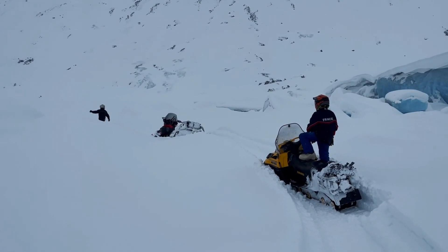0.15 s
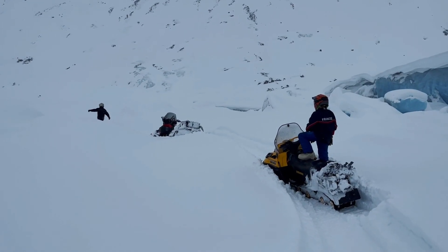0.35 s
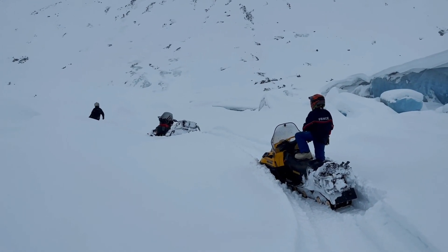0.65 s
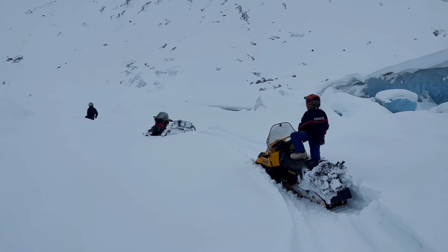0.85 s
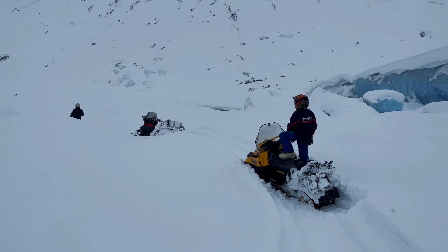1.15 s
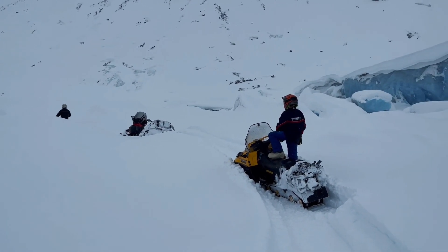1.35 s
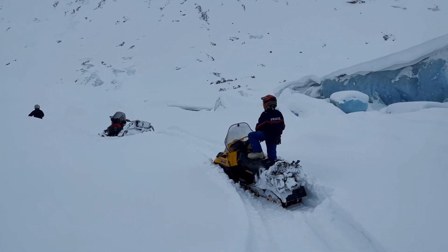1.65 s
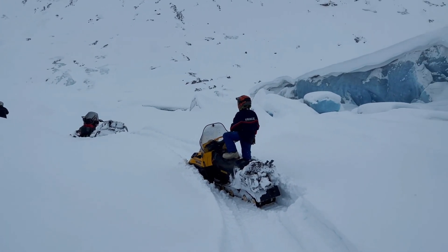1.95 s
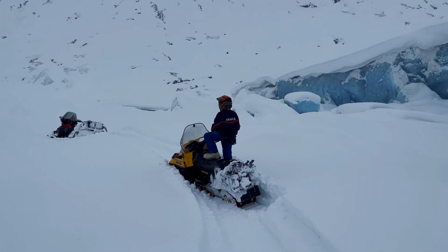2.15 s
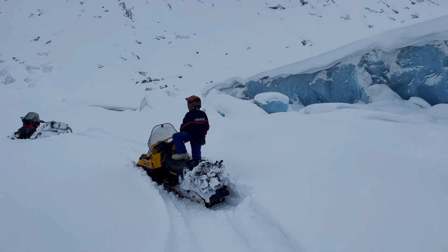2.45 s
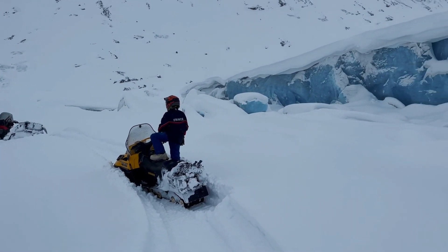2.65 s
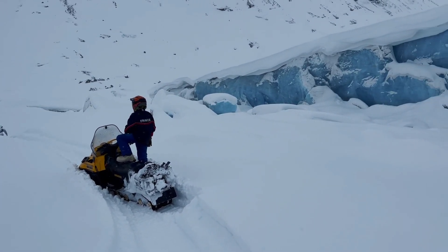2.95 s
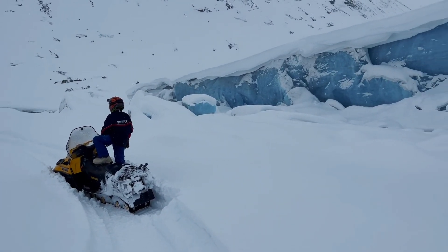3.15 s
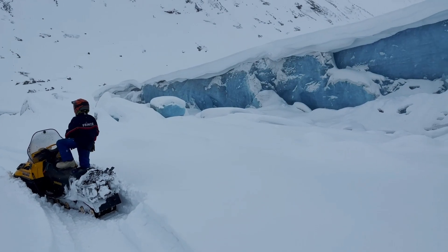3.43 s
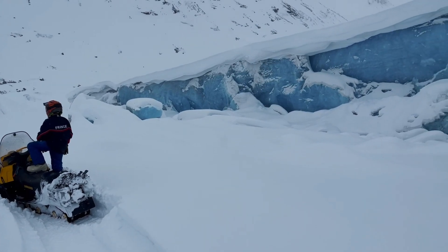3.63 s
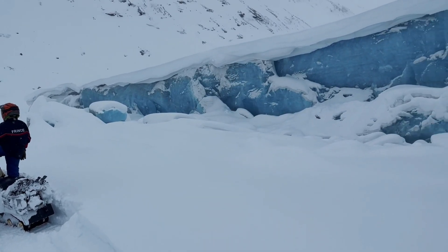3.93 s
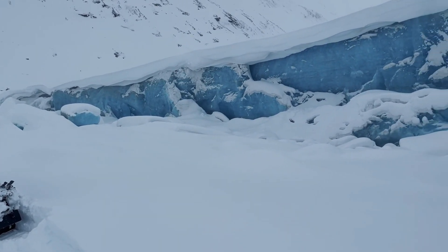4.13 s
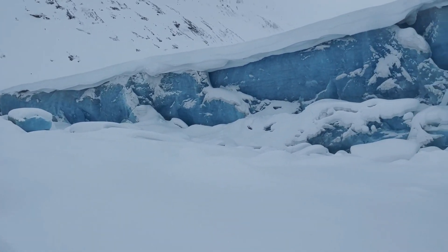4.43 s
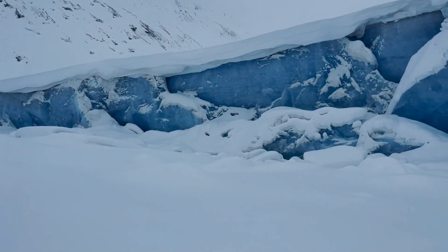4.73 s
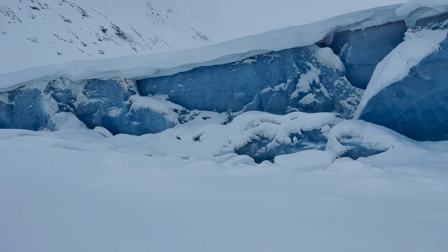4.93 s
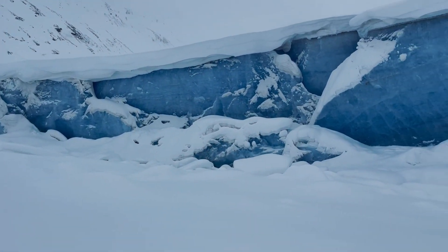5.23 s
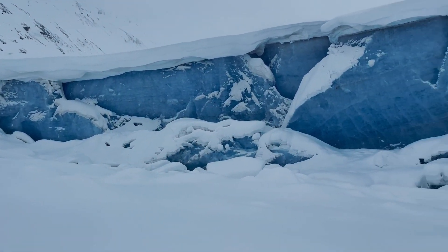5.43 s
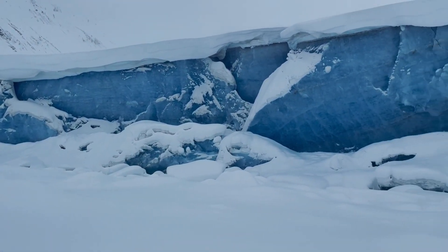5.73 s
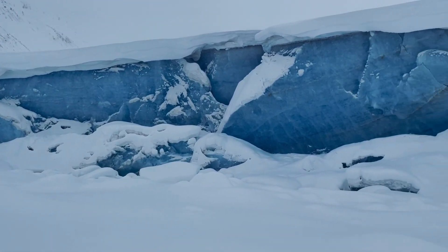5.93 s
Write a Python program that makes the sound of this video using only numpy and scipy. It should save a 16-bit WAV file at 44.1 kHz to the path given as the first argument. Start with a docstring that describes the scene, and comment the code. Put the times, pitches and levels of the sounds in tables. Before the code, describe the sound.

Uneven snowmobile idle, low thudding puffs and rattling clutch, surges briefly outdoors; heavy wind pops and tearing roars strike near the end.

```python
"""Open snow: a two-stroke snowmobile idles a few metres from a hand-held camera, with brief surges.
The exhaust thuds once a turn and misfires about every third: swinging puffs timed by the crank.
Pistons, clutch and cowling clatter with the crank: filtered noise bursts over a steady rush.
The camera pans away and the machine drifts left: delay, shading and gliding dips and peaks per port.
Wind buffets the microphone: low rumble, short roars and pointed pops; one dry click with a soft thump."""
import sys
import numpy as np
from scipy import signal
from scipy.fft import rfft, irfft
from scipy.io import wavfile
from scipy.ndimage import uniform_filter1d

SR = 44100
rng = np.random.default_rng(int(sys.argv[2]) if len(sys.argv) > 2 else 0)


def transcribe(u):
    """Save the signal u as a 16-bit wav file named by the first command-line argument.

    u: samples, shape (n,) or (channels, n), limited to [-1, 1]; the rate is SR.
    q: integer samples, one column per channel.
    """
    v = np.clip(np.atleast_2d(u).T, -1, 1)
    q = np.round(v * 32767).astype(np.int16)
    wavfile.write(sys.argv[1], SR, q)


N = 268348
TIME_S = np.arange(N) / SR

# crank speed, idle with quick surges: [t/s, speed/(turns/s)]
SPEED = [(0.0, 25.66), (1.0, 25.99), (1.16, 29.08), (1.57, 26.18), (1.7, 26.7), (1.94, 24.85), (2.52, 26.6),
         (2.62, 27.8), (2.76, 28.5), (2.95, 28.0), (3.06, 28.6), (3.16, 27.3), (3.42, 26.15), (4.11, 25.28),
         (4.18, 26.5), (4.56, 25.15), (4.86, 27.26), (5.68, 25.25), (6.08, 26.21)]
START_TURN = .941
# late, weak burns: [t/s]
MISFIRES = [.11, .27, .43, .58, .69, .81, .93, 1.04, 1.15, 1.25, 1.47, 1.59, 1.7, 1.73, 1.93, 2.05, 2.17,
            2.28, 2.4, 2.48, 2.51, 2.62, 2.72, 2.83, 3.01, 3.05, 3.27, 3.38, 3.49, 3.61, 3.73, 3.84, 3.96,
            4.04, 4.19, 4.3, 4.42, 4.46, 4.62, 4.66, 4.78, 4.88, 5.42, 5.46, 5.5, 5.58]
# ring of the silencer after each puff
PIPE_RING_S, PIPE_RING_SHARE = 0.018, 0.042

# knocks within each turn: [crank angle/turns, cowling level/dB, bright metal level/dB]
KNOCKS = [(-.03, -6.5, -20), (.05, -2.5, 0.5), (.62, -3.5, 6), (.73, -12, 0.5)]
METAL_SPREAD_DB = 2
# cowling and engine block, relative spectrum: [f/Hz, level per Hz/dB]
COWLING = [(100, -22.5), (250, 6.5), (410, -9), (500, -7.5), (620, 1), (900, 3), (1100, -2), (1600, 2.5),
           (2150, 0), (2700, -8.5), (3700, -23), (6000, -31.5), (12000, -42)]
# their panel modes: [f/Hz, width/Hz, boost/dB]
COWLING_MODES = [(403.3, 30, 17.3), (645, 9.7, 8.7), (798, 60, 9.3), (965, 19, 8.2), (1197, 137, 8.7),
                 (1346, 17, 5.1), (1465, 29, 4.9), (1500, 52, 2), (1613, 70, 5.2), (1674, 10, 9.2),
                 (1887, 38, 9), (1964, 35, 5.8), (2227, 96, 5.2), (2502, 18, 8.7), (3228, 410, 14.4),
                 (4300, 310, 14)]
# clutch and fins, relative spectrum: [f/Hz, level per Hz/dB]
METAL = [(300, -65), (1200, -5), (2000, 18), (2900, -13.5), (3700, 4.5), (4500, 7), (5300, 2), (6300, 7.5),
         (7400, 1), (8900, 7), (10000, -1), (11000, 4.5), (11700, -6), (12400, -39)]
# their resonances: [f/Hz, width/Hz, boost/dB]
METAL_MODES = [(3290, 110, -10.5), (4170, 120, 2)]
# clacks that stand out: [t/s, relative level/dB]
CLACKS = [(.2374, -42), (0.582, -38), (.814, -38), (1.047, -34.5), (1.1911, -34.5), (1.26, -39.5),
          (1.476, -36), (1.59, -36), (1.6995, -36.5), (1.935, -37), (2.093, -38), (2.404, -37),
          (2.555, -35), (3.887, -34.5), (4.124, -35.5), (4.355, -35), (4.5508, -33), (4.665, -35.5),
          (4.891, -36.5), (4.965, -38), (5.116, -37.5), (5.307, -37), (5.418, -37.5), (5.657, -37)]
# ordinary clacks, base strength: [t/s, relative level/dB]
CLACK_LEVEL = [(0, -44), (1.1, -45.5), (1.8, -37.5), (2.3, -41.5), (2.9, -49), (3.1, -39.5), (3.5, -38.5),
               (4.2, -41.5), (5.0, -37), (5.25, -43), (5.6, -41.5), (6.08, -48)]
# added to the ordinary clack on the turn after a misfire, from the jerk
JERK_DB = 2.8

# pan: [t/s, low-pitch lead of left port/ms, shadow before weighting/dB,
#       exhaust level/dB, cowling level/dB, bright metal level/dB]
PAN = [(0, -.01, 2, -42, -37, -50.5), (.6, 0.058, 2.5, -33.5, -39, -49.5),
       (1.2, 0.049, 1, -31.5, -38.5, -49.5), (1.8, 0.013, 0, -28, -39, -49),
       (2.4, 0.087, 4.5, -25, -39.5, -51), (3.0, 0.26, 1.5, -24, -39, -50.5),
       (3.7, 0.35, 6.5, -27, -39.5, -48.5), (4.4, 0.4, 6, -24.5, -39, -48.5),
       (5.0, 0.43, 3, -27.5, -40, -53), (5.5, 0.46, 2, -34, -38, -52), (6.08, 0.47, 2, -44, -39.5, -56.5)]
# weight of the shadow by pitch: [f/Hz, share]
SHADOW = [(100, 0.56), (600, 0.95), (1500, 1.13), (2700, 0.32), (3700, 2.3), (5500, 1.4), (7200, 0.095),
          (8500, 0.066)]
# extra phase lag of the right port's treble during the middle of the pan: [t/s, extra phase/turns]
TREBLE_LAG = [(2.75, 0), (2.95, .58), (3.4, .4), (3.7, .2), (4.4, 0)]
TREBLE_LAG_HZ = 3870
# gliding dips and peaks as the camera turns, left port: [width/octaves, [t/s, f/Hz, gain/dB]]
LEFT_GLIDES = [(.15, [(1.9, 2650, -21), (2.5, 2870, 11), (2.9, 2640, 11.5), (3.5, 2380, 5.5),
               (4.3, 2210, 5), (5.0, 2500, 1)]), (.2, [(2.0, 4200, 1.5), (2.5, 5400, -3), (2.9, 5940, -8),
               (3.3, 7000, -13), (4.05, 6700, -7.5), (6.08, 7800, -1)]), (.25, [(0, 5850, 3),
               (1.9, 6160, 2), (2.5, 7560, 6), (2.8, 7600, 2)]), (.4, [(3.0, 1760, -0.5), (4.2, 1650, -4),
               (5.0, 1510, -5.5), (6.08, 1550, -7)])]
# same, right port, which turns away from the machine: [width/octaves, [t/s, f/Hz, gain/dB]]
RIGHT_GLIDES = [(0.43, [(2.1, 2350, 1.5), (2.55, 2260, -9), (2.9, 2060, -12), (3.45, 1910, -6.5),
                (4.1, 1760, 1.5), (5.0, 1400, -0.5)]), (0.1, [(2.0, 6300, 1), (2.45, 5660, 8),
                (2.95, 3700, -9), (3.45, 3300, -35), (4.05, 2880, -36), (4.5, 2640, -17),
                (5.5, 2500, -25)]), (0.23, [(3.4, 7340, 1), (4.05, 6100, -8), (4.4, 5230, -7),
                (5.0, 4200, 1)]), (0.15, [(4.5, 7140, -3), (5.2, 6720, -19), (6.08, 6560, -12.5)]),
                (0.086, [(2.5, 6900, -4), (2.95, 6300, 5.5), (3.45, 4300, 14), (4.05, 3800, 15),
                (4.5, 3580, 15.5), (5.5, 3480, -27)]), (0.26, [(3.0, 2800, 0.5), (5.0, 650, -3)])]
# scattered sound, before its tilt by pitch
STRAY_DB = -13

# wind on the microphone, before flutter and gusts: [t/s, level/dB]
BREEZE = [(0, -25), (.65, -34.5), (1.3, -30), (1.6, -33), (2.8, -35.5), (3.4, -31), (4.0, -28), (4.9, -30),
          (5.5, -33), (6.08, -28.5)]
# wind rumble, relative spectrum: [f/Hz, level per Hz/dB]
RUMBLE = [(15, -44), (30, -16), (45, -6.5), (62, 0.5), (100, -2), (180, -7), (300, -22.5), (600, -33.5),
          (2000, -63)]
# level of the opposed part of the wind against the common part
WIND_APART = .42
# gusts striking the microphone: [t/s, length/s, level/dB, top of roar f/Hz]
BUFFETS = [(0.154, 0.026, -23, 517), (.194, 0.039, -28, 430), (0.839, 0.057, -30.5, 232),
           (2.319, 0.033, -28, 258), (3.738, 0.099, -27, 262), (4.17, 0.087, -29.5, 200),
           (4.533, 0.035, -26, 336), (4.988, 0.015, -15.5, 400), (4.996, 0.16, -19, 145),
           (5.009, 0.053, -18, 313), (5.068, 0.021, -25, 220), (5.116, 0.055, -16.5, 278),
           (5.24, 0.015, -19, 438), (5.272, 0.021, -17, 233), (5.33, 0.056, -19.5, 327),
           (5.517, 0.033, -24, 480), (5.614, 0.028, -19, 333), (5.677, 0.022, -21.5, 656),
           (5.733, 0.039, -21, 440), (5.775, 0.018, -13, 810), (5.792, 0.15, -16, 645),
           (5.943, 0.018, -19, 201), (6.001, 0.023, -22, 480), (6.053, 0.015, -25.5, 523)]
# small fast eddies right on the port: [t/s, peak level/dB, f/Hz]
POPS = [(.163, -14, 710), (4.548, -22.5, 395), (4.992, -0.5, 260), (5.018, -19, 510), (5.038, -9, 302),
        (5.055, -4, 268), (5.082, -12.5, 367), (5.1, -18.5, 436), (5.129, -9.5, 335), (5.14, -20, 171),
        (5.245, -7.5, 306), (5.349, -12.5, 337), (5.366, -19.5, 473), (5.379, -23.5, 510),
        (5.782, -20, 390), (5.789, -10.5, 1040), (5.822, -7, 1340), (5.829, -4, 1270), (5.838, -12, 1290),
        (5.849, -24, 1440), (5.858, -5.5, 1270), (5.864, -21, 1800), (5.882, -8, 1720), (5.89, -9.5, 1350),
        (5.931, -10, 1100)]
# dry click, soft thump: [t/s, thump level/dB]
CLICK = (3.082, -17)
# pops where the last gust tears: [t/s, length/s, middle peak level/dB, middle f/Hz]
CRACKLE = (5.818, 0.08, -19.5, 1150)
CRACKLE_OCTAVES = .6
EDGE_HZ = 12700


def gain_of(db):
    """Decibels to an amplitude factor."""
    return 10 ** (np.asarray(db) / 20)


def evened(x):
    """Scale to rms 1."""
    return x / np.sqrt(np.mean(x ** 2) + 1e-20)


def read(points, hz):
    """Interpolate a spectrum table on a log-frequency axis."""
    f, value = np.transpose(points)
    return np.interp(np.log(hz + 1), np.log(f + 1), value)


def curves(rows, t):
    """Interpolate every column of a time table at t."""
    s, *columns = np.transpose(rows)
    return [np.interp(t, s, c) for c in columns]


def add(mix, start_s, sound):
    """Mix a sound in at start_s, in place."""
    part = mix[..., max(round(start_s * SR), 0):][..., :sound.shape[-1]]
    part += sound[..., :part.shape[-1]]


def colour(x, spectrum, modes=()):
    """Causal minimum-phase filter: spectrum plus resonances."""
    size = 4096
    hz = abs(np.fft.fftfreq(size, 1 / SR))
    db = read(spectrum, hz)
    for f, width_hz, boost_db in modes:
        db = db + boost_db / (1 + (2 * (hz - f) / width_hz) ** 2)
    log_response = np.conj(signal.hilbert(np.log(gain_of(db))))
    response = np.fft.ifft(np.exp(log_response)).real
    return signal.oaconvolve(x, response)[:len(x)]


def crank(angle_turns):
    """Times/s at which the crank passes an angle: speed integrated, then inverted."""
    turns = START_TURN + np.cumsum(curves(SPEED, TIME_S)[0]) / SR
    return np.interp(np.arange(1, int(turns[-1]) + 1) + angle_turns, turns, TIME_S)


def misfired():
    """1 for every turn that misfires, else 0."""
    times = crank(.5)
    missed = np.zeros(len(times))
    missed[np.searchsorted(times, MISFIRES) - 1] = 1
    return missed


def exhaust(port_turns=0.5665, pipe_hz=124, hot_hz=66, cool_s=0.0054, swell_s=0.0082,
            misfire_db=-9.5, late_s=0.006, boom=0.29, boom_hz=88,
            spread_db=1.5, scatter_hz=4.1, jitter_s=0.00065, low_cut_hz=30):
    """The port opens half a turn after ignition; a puff swings the silencer, late, weak, cool on a misfire."""
    times, out, t = crank(port_turns), np.zeros(N), np.arange(SR // 8) / SR
    u = t / swell_s
    swell = u * np.exp(1 - u)
    swing = swell ** 0.91 + PIPE_RING_SHARE * (1 - np.exp(-u * 2)) * np.exp(-t / PIPE_RING_S)
    box = boom * swell ** 2 * np.cos(2 * np.pi * boom_hz * (t - swell_s))
    draws = rng.standard_normal((len(times), 3))
    for s, miss, (burn, tune, slip) in zip(times, misfired(), draws):
        # hot gas starts sharp, falls in pitch as it cools
        hz = pipe_hz + scatter_hz * tune + hot_hz * (1 - .5 * miss) * np.exp(-t / cool_s)
        pipe = swing * np.sin(2 * np.pi * np.cumsum(hz) / SR)
        gain = gain_of(misfire_db * miss + spread_db * burn)
        add(out, s + late_s * miss + jitter_s * slip, gain * (pipe + box))
    return evened(signal.sosfilt(signal.butter(1, low_cut_hz, "high", fs=SR, output="sos"), out))


def burst(decay_s, rise_s, grain_db=2.5):
    """Struck part: dense noise ring with a grainy envelope."""
    t = np.arange(SR // 14) / SR
    ring, grain = rng.standard_normal((2, len(t)))
    ring = evened(ring * gain_of(grain_db * evened(uniform_filter1d(grain, size=40))))
    return ring * (1 - np.exp(-t / rise_s)) * np.exp(-t / decay_s)


def clatter(levels_db, decay_s, rise_s, spread_db, alike, rush_db, swing_db, jitter_s=.0002):
    """Knocks at fixed crank angles, alternating in force by turn, over the rush of the cooling fan."""
    out, alike = np.zeros(N), np.clip(alike, 0, 1)
    for (angle, *_), db in zip(KNOCKS, levels_db):
        own, times = burst(decay_s, rise_s), crank(angle)
        draws = rng.standard_normal((len(times), 2))
        for turn, (s, (force, slip)) in enumerate(zip(times, draws)):
            ring = alike * own + np.sqrt(1 - alike ** 2) * burst(decay_s, rise_s)
            knock_db = db + spread_db * force + swing_db * (-1) ** turn
            add(out, s + jitter_s * slip, gain_of(knock_db) * ring)
    return evened(out) + gain_of(rush_db) * rng.standard_normal(N)


def cowling():
    """Knocks and rush through the panel modes of cowling and block."""
    knocks = clatter(np.transpose(KNOCKS)[1], decay_s=0.009, rise_s=0.0036, spread_db=1.5,
                     alike=0.64, rush_db=-11.0, swing_db=-0.97)
    return evened(colour(knocks, COWLING, COWLING_MODES))


def bright_metal():
    """The same knock angles ringing in clutch and fins."""
    knocks = clatter(np.transpose(KNOCKS)[2], decay_s=0.008, rise_s=0.0041,
                     spread_db=METAL_SPREAD_DB, alike=0.86, rush_db=-5, swing_db=1.0)
    return evened(colour(knocks, METAL, METAL_MODES))


def clacks(angle_turns=-.01, spread_db=2.33, decay_s=0.013, rise_s=0.0025, sharp_rise_s=0.00061,
           between_db=-16, level_db=-1.5, cowling_db=9):
    """Clutch slack taken up, strong and weak by turns, shakes the cowling; listed clacks start sharply."""
    metal, shell = np.zeros((2, N))
    times = crank(angle_turns)
    levels_db = curves(CLACK_LEVEL, times)[0] + np.resize([between_db, 0], len(times))
    levels_db += spread_db * rng.standard_normal(len(times))
    levels_db += JERK_DB * np.roll(misfired(), 1)
    rises_s = np.full(len(times), rise_s)
    # listed clacks replace the nearest ordinary ones
    for s, db in CLACKS:
        turn = np.argmin(abs(times - s))
        times[turn], levels_db[turn], rises_s[turn] = s, db - 1.5, sharp_rise_s
    for s, db, rise in zip(times, levels_db, rises_s):
        add(metal, s, gain_of(db + level_db) * burst(decay_s, rise))
        add(shell, s, gain_of(db + cowling_db) * burst(decay_s=0.01, rise_s=0.0018))
    # a sharp blow hardly moves the low panel modes
    shell = colour(shell, [(300, -6.5), (900, -5.0), (1600, 6.5)])
    return colour(metal, METAL, METAL_MODES) + colour(shell, COWLING, COWLING_MODES)


def glides(table, hz, t):
    """Waves round the turning camera body cancel or add at moving pitches: gain by pitch and time."""
    db = 0
    for octaves, track in table:
        centre_hz, height_db = curves(track, t)
        db = db + height_db * np.exp(-(np.log2((hz + 1) / centre_hz) / octaves) ** 2)
    return gain_of(db)


def ports(x, merge_hz=7800, twist_hz=10200, twist_width_hz=600, bend_hz=4000, bend=0.16):
    """Two ports: delay and scatter below merge_hz, a phase twist above it; shadow and glides shape each."""
    hz, t, z = signal.stft(x, SR, nperseg=512, noverlap=384)
    lead_ms, shadow_db = curves(PAN, t)[:2]
    hz = hz[:, None]
    apart = 1 / (1 + (hz / merge_hz) ** 20)
    # short waves bend round the camera with less delay than long ones
    lag_rad = 2 * np.pi * hz * apart * (lead_ms / 1000) / (1 + (hz / bend_hz) ** 2) ** bend
    treble_turns = curves(TREBLE_LAG, t)[0] * apart / (1 + (TREBLE_LAG_HZ / (hz + 1)) ** 10)
    lag_rad = lag_rad + 2 * np.pi * treble_turns
    twist_rad = 2 * np.arctan((hz - twist_hz) / twist_width_hz) + np.pi
    # sound scattered by snow and ice reaches the two ports unequally
    scatter = rng.standard_normal(z.shape) + 1j * rng.standard_normal(z.shape)
    stray = gain_of(STRAY_DB) * apart * hz / (hz + 1200) * abs(z) * scatter
    shade = gain_of(shadow_db * read(SHADOW, hz))
    left = (z + stray) * glides(LEFT_GLIDES, hz, t) * shade ** 0.58
    right = (z - stray) * glides(RIGHT_GLIDES, hz, t) / shade ** 0.21
    right = right * np.exp(-1j * (lag_rad + twist_rad * (1 - apart)))
    return signal.istft(np.array([left, right]), SR, nperseg=512, noverlap=384)[1][:, :N]


def snowmobile():
    """Exhaust, cowling, bright metal and clacks on one crank, heard at both ports."""
    exhaust_db, cowling_db, metal_db = curves(PAN, TIME_S)[2:]
    machine = gain_of(exhaust_db) * exhaust()
    machine += gain_of(cowling_db) * cowling()
    machine += gain_of(metal_db) * bright_metal()
    return ports(machine + clacks())


def breeze(gust_db=-10, linger_s=0.02, flutter_db=2.0, flutter_hz=9):
    """Moving air rumbles at both ports, partly in common; it flutters and swells around every gust."""
    both, apart = (evened(colour(n, RUMBLE)) for n in rng.standard_normal((2, N)))
    slow = np.fft.rfftfreq(N, 1 / SR) < flutter_hz
    flutter = evened(irfft(rfft(rng.standard_normal(N)) * slow, N))
    power = gain_of(curves(BREEZE, TIME_S)[0] + flutter_db * flutter) ** 2
    for s, length_s, db, _ in BUFFETS:
        offset = (TIME_S - s - length_s / 2) / (length_s / 2 + linger_s)
        power = power + gain_of(db + gust_db) ** 2 * np.exp(-offset ** 2)
    return np.sqrt(power) * (both + WIND_APART * np.array([apart, -apart]))


def buffets(low_hz=85, steepness=3.51, droop=0.53, side=0.41, left_db=0.7):
    """Each eddy is a short roar of pressure: gated noise in a band up to its own top pitch."""
    out, size = np.zeros((2, N)), 16384
    hz = np.fft.rfftfreq(size, 1 / SR) + 1
    t = (np.arange(size) - size // 8) / SR
    for s, length_s, db, top_hz in BUFFETS:
        gate = np.sin(np.pi * np.clip(t / length_s, 0, 1)).clip(0) ** .5
        edges = (1 + (low_hz / hz) ** 5) * (1 + (hz / top_hz) ** (2 * steepness))
        shape = (hz / low_hz) ** -droop / np.sqrt(edges)
        roar = irfft(rfft(gate * rng.standard_normal((2, size))) * shape)
        # rms 1 over the gust's length
        both, apart = roar * np.sqrt(length_s * SR / np.sum(roar ** 2, axis=1, keepdims=True))
        add(out, s + t[0], gain_of(db) * np.array([both + side * apart, both - side * apart]))
    return out * gain_of([[left_db], [-left_db]])


def pops(width_turns=0.23):
    """Each pop, single or in the crackle, is one quick, pointed swing of pressure."""
    out, t = np.zeros(N), np.arange(-SR // 50, SR // 50) / SR
    for s, db, hz in [*POPS, *crackle()]:
        swing = np.cos(2 * np.pi * hz * t) / np.cosh(hz * t / width_turns)
        add(out, s + t[0], -gain_of(db) * swing)
    return out


def click(thump_s=0.0031, tick=0.14, tick_s=0.0002):
    """A small decaying step of pressure with a sharp noisy edge."""
    out, t = np.zeros(N), np.arange(SR // 20) / SR
    start_s, db = CLICK
    edge = tick * rng.standard_normal(len(t)) * np.exp(-t / tick_s)
    add(out, start_s, gain_of(db) * (np.exp(-t / thump_s) + edge))
    return out


def crackle(count=56, spread_db=4):
    """Torn flow: pops of random size and pitch in uneven succession, rows [t/s, peak level/dB, f/Hz]."""
    start_s, length_s, db, hz = CRACKLE
    place, size, pitch = rng.uniform(-1.01, 1, (count, 3)).T
    times = start_s + length_s * (1 + place) / 2
    return zip(times, db + spread_db * size, hz * 2 ** (CRACKLE_OCTAVES * pitch))


def scene():
    """Machine, wind and click; open snow gives no echo."""
    return snowmobile() + breeze() + buffets() + pops() + click()


def record(dry):
    """Band limit of the camera: linear-phase low-pass."""
    low_pass = signal.firwin(255, EDGE_HZ, window=("kaiser", 8), fs=SR)
    return signal.oaconvolve(dry, low_pass[None], "same")


dry = scene()
out = record(dry)
transcribe(out)
```